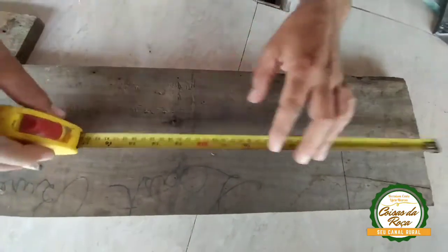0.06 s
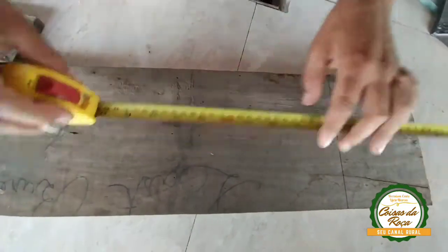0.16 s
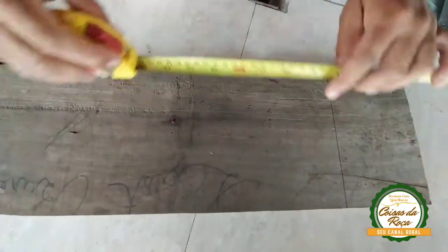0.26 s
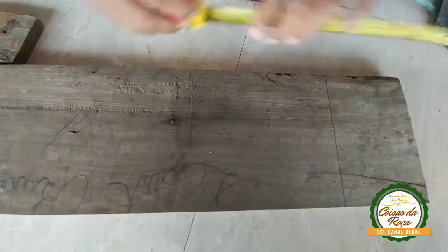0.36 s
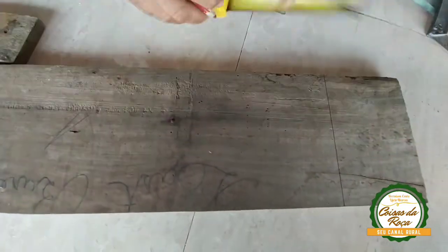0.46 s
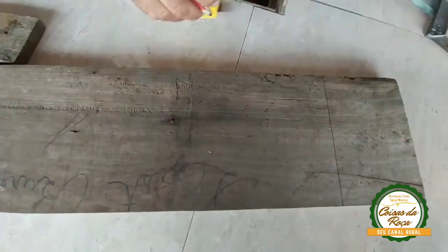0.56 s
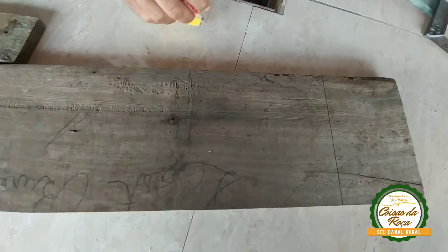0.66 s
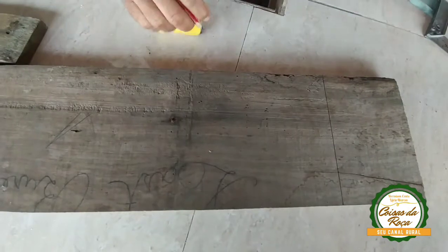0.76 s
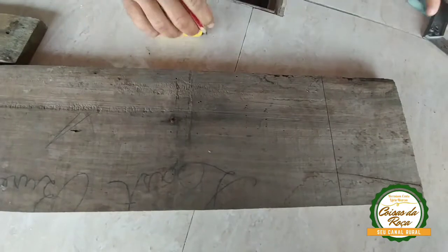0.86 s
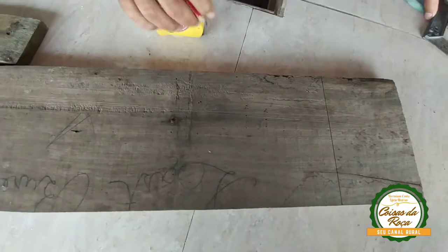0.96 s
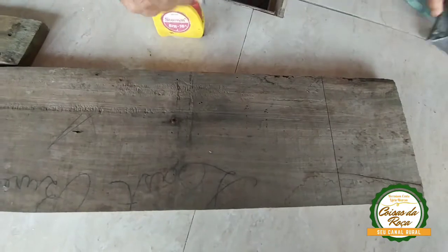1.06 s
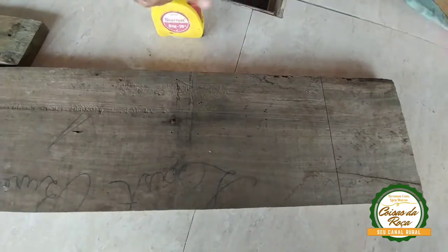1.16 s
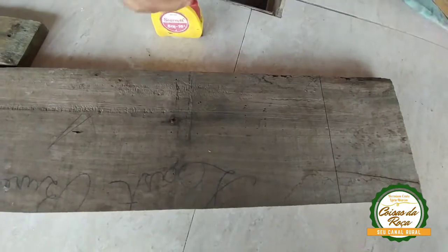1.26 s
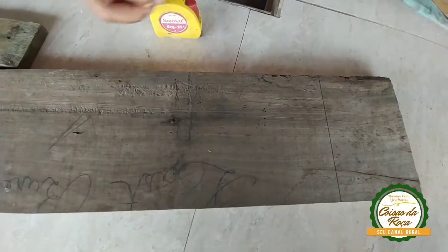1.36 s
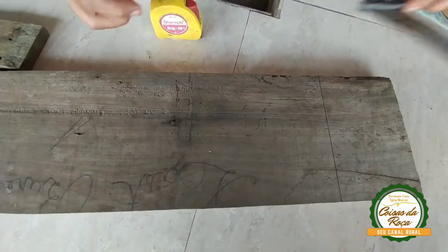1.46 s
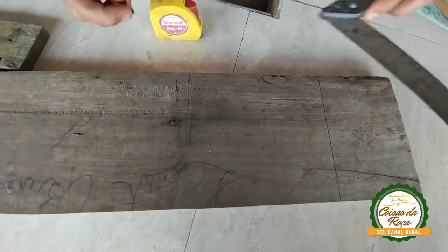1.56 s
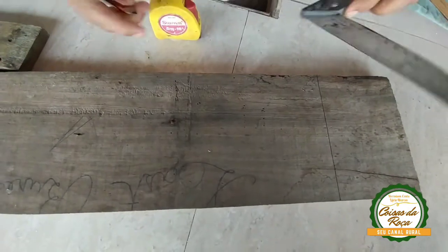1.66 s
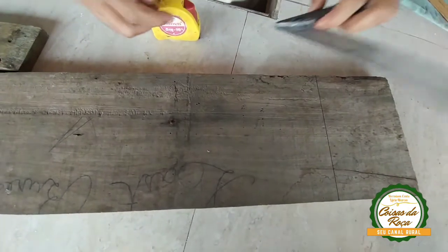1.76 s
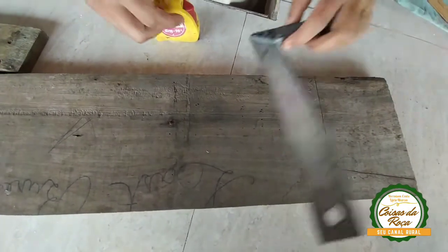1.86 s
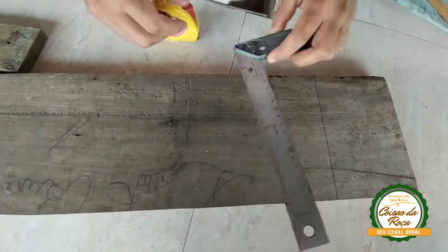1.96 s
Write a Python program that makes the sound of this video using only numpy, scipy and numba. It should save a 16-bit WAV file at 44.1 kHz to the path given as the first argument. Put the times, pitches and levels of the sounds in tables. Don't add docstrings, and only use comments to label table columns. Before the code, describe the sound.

A steel tape measure whirs and slaps back into its plastic case, then is set down

```python
import sys
import numpy as np
from scipy import signal
from scipy.fft import rfft, irfft
from scipy.io import wavfile
from scipy.ndimage import uniform_filter1d
from numba import njit

SR = 44100
rng = np.random.default_rng(int(sys.argv[2]) if len(sys.argv) > 2 else 0)


def to_wav(sig):
    pcm = np.clip(np.atleast_2d(sig), -1, 1) * 32767
    pcm = np.round(pcm).astype(np.int16)
    wavfile.write(sys.argv[1], SR, pcm.T)


def how_loud(loudness_db):
    steps = np.asarray(loudness_db, float) / 20
    return 10 ** steps


N = 88200


def unit(x):
    return x / np.sqrt(np.mean(x ** 2) + 1e-30)


def curve(table, order):
    rows = np.array(table)
    return np.interp(np.arange(N) / SR, rows[:, 0], rows[:, order])


def butter(x, order, hz, kind="low"):
    return signal.sosfilt(signal.butter(order, hz, kind, fs=SR, output="sos"), x)


def colour(x, points):
    size = 4096
    hz, db = np.array(points).T
    log_hz = np.log(np.maximum(np.arange(size // 2 + 1), 1) * SR / size)
    corners = np.log(np.r_[hz[0] / 2, hz, hz[-1] * 1.2])
    db = np.interp(log_hz, corners, np.r_[db[0] - 30, db, db[-1] - 30])
    cep = irfft(db * np.log(10) / 20)
    cep[1:size // 2] *= 2
    cep[size // 2 + 1:] = 0
    h = irfft(np.exp(rfft(cep)))
    h = (h / np.linalg.norm(h)).reshape((1,) * (x.ndim - 1) + (-1,))
    return signal.fftconvolve(x, h, axes=-1)[..., :N]


def ring(x, modes):
    t = np.arange(SR // 4) / SR
    h = 0
    for hz, db, t60 in modes:
        decay = how_loud(db - 60 * t / max(t60, .003))
        h = h + decay * (1 - np.exp(-t * hz)) * np.sin(2 * np.pi * hz * t)
    return signal.fftconvolve(x, h / np.linalg.norm(h))[:N]


def clicks(rate):
    scatter_db = 3
    chance, sign, size = rng.random((3, N))
    return unit((chance < rate / SR) * np.sign(sign - .5) * how_loud(-scatter_db * np.log(size + 0.0141)))


def walk(rate):
    k = int(SR / rate)
    steps = np.repeat(rng.standard_normal(N // k + 1), k)
    return 1.253 * uniform_filter1d(uniform_filter1d(steps, k), k)[:N]


def burst(at, length):
    s = np.maximum(np.arange(N) / SR - at, 0) / max(length, 3e-4)
    return 2 * (1 - np.exp(-s * 4)) * np.exp(-s)


def ports(x, pan_db, lag_ms):
    late = np.interp(np.arange(N) - lag_ms * SR / 1000, np.arange(N), x)
    return np.array([x * how_loud(pan_db / 2), late * how_loud(-pan_db / 2)])


def tape():
    # time_s, level_db, case_share_db
    whir = [
        (.325, -25, -31),
        (.4, -24, -18),
        (.48, -24, -22),
        (.56, -24.5, -14.5),
        (.64, -24, -19),
        (.68, -27.5, -37.5),
        (.718, -20.5, -20),
    ]
    # start_s, peak_db, burst_s, case_share_db
    slaps = [(.069, -35, .003, -15), (.123, -33, .004, -15), (.141, -24, .003, -24), (.163, -27, .008, -26),
             (.2102, -24, .0015, -24), (.2125, -14, .002, -27), (.2175, -11, .0018, -22),
             (.2207, -10, .001, -19), (.2348, -19, .0015, -24), (.239, -25, .002, -24),
             (.255, -18, .0015, -24), (.2583, -17, .002, -24), (.2655, -21, .0015, -24),
             (.268, -20, .002, -22), (.2732, -11, .0015, -26), (.2775, -22, .002, -24),
             (.3168, -22, .0015, -24), (.3187, -9, .0025, -24), (.3225, -11, .001, -16),
             (.3255, -19, .0015, -22), (.3293, -7, .0014, -24), (.3505, -14, .002, -27),
             (.361, -16, .0015, -26), (.3836, -15, .0015, -26), (.395, -17, .0015, -26),
             (.411, -14, .002, -22), (.437, -14, .003, -22), (.4694, -11, .004, -24),
             (.478, -15, .002, -24), (.5085, -12, .004, -27), (.536, -13, .003, -22),
             (.6615, -17, .002, -22), (.6725, -17, .005, -18), (.692, -14, .003, -24),
             (.7035, -15, .003, -22), (.7155, -7, .003, -20), (.850, -13, .007, -14),
             (.909, -10, .002, -14)]
    # hz, level_db
    blade_colour = [(1760, -39), (3100, -11.5), (4060, -15.5), (5240, -14), (7400, -9), (9200, -0.5),
                    (11500, -7.5), (14300, -19)]
    # hz, level_db
    case_colour = [(330, -9.5), (600, -2), (1490, 1.5), (2710, 11), (3730, 13), (4500, -8.5), (5850, -62),
                   (9900, -120)]
    t = np.arange(N) / SR
    pan_db = np.where(t < .34, -8, -3)

    def ticks(rate):
        second_share = 1.135
        return ports(clicks(rate), pan_db, -0.13) + second_share * ports(clicks(rate), pan_db, 1.3)

    running = (t > whir[0][0]) & (t < whir[-1][0])
    flutter_db = 2 * walk(150)
    blade = running * how_loud(curve(whir, order=1) - 4.0 + flutter_db) * ticks(12000)
    case = blade * how_loud(curve(whir, order=2))
    slap = ticks(14000)
    for at, db, length, case_db in slaps:
        shape = burst(at, length)
        even = np.sqrt(np.sum(shape ** 2) / np.sum((shape * slap) ** 2))
        hit = how_loud(db - 3) * shape * slap * even
        blade = blade + hit
        case = case + how_loud(case_db + 7.0) * hit
    ring_share_db = 6
    steel = patchy(colour(blade, blade_colour) + how_loud(ring_share_db) * sing(blade))
    return steel + colour(case, case_colour) + coil_rub()


def sing(x):
    # pitch_hz, width_hz, level_db
    blade_rings = [
        (9120, 660, 3.5),
        (9360, 740, 1.5),
        (10600, 790, -6.5),
        (6820, 700, -8),
    ]
    out = 0
    for hz, width, db in blade_rings:
        centre = hz * (1 + .035 * walk(45))
        out = out + how_loud(db) * np.array([svf(v + 1e-18, centre, width) for v in x])
    return out


@njit
def svf(x, hz, width):
    y, band, low = np.empty(len(x)), 0., 0.
    for i in range(len(x)):
        g, k = np.tan(np.pi * hz[i] / SR), width / hz[i]
        v = (band + g * (x[i] - low)) / (1 + g * (g + k))
        band, low, y[i] = 2 * v - band, low + 2 * g * v, k * v
    return y


def patchy(x):
    swell_db, swell_rate = 2.8, 30
    edges = np.geomspace(2000, 19000, 14)
    out = 0
    for band in zip(edges, edges[1:]):
        out = out + butter(x, 2, band, "band") * how_loud(swell_db * walk(swell_rate))
    return out


def coil_rub():
    # pitch_hz, width_hz, start_s, end_s, level_db
    coil = (580, 110, .5, .77, -52)
    t = np.arange(N) / SR
    hz, width, start, end, db = coil
    level = (t > start) * (t < end) * how_loud(db + 1.0 * walk(7.5))
    return level * ring(clicks(3000), [(hz, 0, 3.9 / width)])


def knocks():
    # start_s, level_db, left_over_right_db, right_lag_ms, contact_s, chatter_share
    blows = [
        (0.547, -39, -3, -0.2, 0.019, 7.5),
        (0.716, -12, -6.5, 0.029, 0.0043, 0.83),
        (0.7221, -20.5, -3.5, -0.11, .001, 0.314),
        (0.851, -19.5, -11.5, 0.56, 0.007, 1.13),
        (0.9095, -8, -2, 0.067, 0.00049, 0.12),
        (0.9124, -8, 0, 0.08, 0.00086, 0.13),
        (1.125, -23, -4.5, -0.12, 0.015, 4.5),
    ]
    # pitch_hz, level_db, t60_s
    slop = [(596, -2, 0.0416), (723, 5, 0.029), (980, 3.5, 0.031)]
    snap = [(1266, -2.5, 0.019), (1547, -1, 0.017), (2450, -2, 0.017), (3000, 4, .012), (4780, 9, .012),
            (4960, 12, .014), (6520, 8, .01), (7250, 7.5, .01)]
    seat = [(515, 0, 0.018), (630, -1.5, 0.017), (805, 0, 0.022)]
    tilt = [(1270, -2.5, 0.039), (1980, 0.5, .015), (2400, 11.5, .018), (2700, -34, .015), (4280, 5, .012)]
    land = [(185, -11, 0.11), (818, -20, 0.026), (980, -9, .04), (1107, 0.5, 0.021), (1397, -6, 0.025),
            (1892, -3, 0.016), (2120, -5.5, .015), (3270, 0, 0.0085), (5500, 6, 0.0069)]
    nudge = [(490, -7.5, 0.049), (785, -0.5, 0.032), (1077, -0.5, 0.029), (1330, 2.5, 0.022),
             (1554, 6, 0.02), (1952, 9.5, 0.014), (2146, 4, .015), (2480, 8.5, .015)]
    longest_cycles = 30
    out = 0
    for blow, modes in zip(blows, (slop, snap, seat, tilt, land, land, nudge)):
        at, db, pan_db, lag_ms, contact, chatter = blow
        push = 3 * burst(at, 0) ** 3 + chatter * burst(at, contact) * clicks(9000)
        x = ring(push, [(hz, g, min(t60, longest_cycles / hz)) for hz, g, t60 in modes])
        x = butter(x, 2, 0.79 * modes[0][0], "high")
        out = out + ports(how_loud(db) * x / np.abs(x).max(), pan_db, lag_ms)
    return out


def slide():
    # start_s, level_db, rise_s, hold_s, fall_db_per_s
    strokes = [
        (1.129, -37.5, 0.01, 0.018, 400),
        (1.18, -33.5, 0.002, 0.032, 398),
    ]
    # hz, level_db
    scrape_colour = [(880, -41), (1500, -9), (3540, -12), (4370, -7), (6000, -5), (7790, -13.5),
                     (9820, 6.5), (15000, -18)]
    # pitch_hz, level_db, t60_s
    tool_rings = [
        (4050, 12, 0.048),
        (9800, 10, 0.04),
        (11900, -11, 0.031),
    ]
    t = np.arange(N) / SR
    push = 0
    for at, db, rise, hold, fall in strokes:
        fallen_db = fall * np.maximum(t - at - rise - hold, 0)
        push = push + np.clip((t - at) / rise, 0, 1) * how_loud(db - fallen_db)
    x = push * how_loud(3.1 * walk(120)) * clicks(11000)
    ring_db = -14.5
    return ports(colour(x, scrape_colour) + how_loud(ring_db) * ring(x, tool_rings), 2, .25)


def porch(x):
    early_t60_s, early_db, early_low_hz = .008, -10, 1700
    late_t60_s, late_db, late_dark_hz = 0.31, -12, 10300
    t = np.arange(SR // 2) / SR
    early = rng.standard_normal((2, len(t))) * how_loud(-60 * t / early_t60_s)
    late = rng.standard_normal((2, len(t))) * how_loud(-60 * t / late_t60_s) * (t > .004)
    early = butter(early, 2, early_low_hz, "high")
    late = butter(late, 1, late_dark_hz)
    h = how_loud(early_db) * early / np.linalg.norm(early[0]) + how_loud(late_db) * late / np.linalg.norm(late[0])
    return signal.fftconvolve(x, h, axes=-1)[:, :N]


def rustle():
    # time_s, level_db
    hands = [
        (0, -47.5),
        (.1, -50.5),
        (.2, -51),
        (.8, -42.5),
        (1.05, -53.5),
        (1.3, -59),
        (1.55, -62.5),
        (2, -60.5),
    ]
    skin_colour = [(900, -3), (2500, -5.0), (5000, -7.5), (9500, -1.0), (14000, -17.5)]  # hz, level_db
    x = colour(np.array([clicks(7000), clicks(7000)]), skin_colour)
    return x * how_loud(curve(hands, order=1) + 2.5 * walk(30.3))


def insects():
    # time_s, pitch_hz, level_db
    drone = [(0, 2340, -58), (1.3, 2230, -60), (1.36, 2400, -58), (1.45, 2380, -56.5), (1.53, 2200, -63),
             (1.62, 2260, -56), (1.68, 2420, -58.5), (1.77, 2400, -61), (1.82, 2250, -69), (2, 2350, -63)]
    width_hz, overtone, overtone_db = 90, 1.48, -9.5
    wobble = butter(rng.standard_normal((2, N)), 2, width_hz / 2)
    cycles = np.cumsum(curve(drone, order=1) * (1 + 0.00818 * walk(11))) / SR
    upper = how_loud(overtone_db + 4.07 * walk(11)) * np.exp(2j * np.pi * overtone * cycles)
    turn = np.exp(2j * np.pi * cycles) + upper
    band = unit(((wobble[0] + 1j * wobble[1]) * turn).real)
    return ports(band * how_loud(curve(drone, order=2) + 1.55 * walk(12.4)), -10.5, -0.35)


def two_port_noise(share):
    return share * rng.standard_normal(N) + rng.standard_normal((2, N))


def puffs():
    # centre_s, level_db, length_s, left_over_right_db
    gusts = [(0, -52.5, 0.066, 3), (0.15, -47, 0.063, 2), (0.372, -58, 0.1, 2), (0.56, -53.5, 0.04, -8.5),
             (0.686, -40.5, 0.032, -18), (0.98, -45, 0.093, 0), (1.132, -51.5, 0.029, -19),
             (0.211, -46, 0.004, 13), (1.636, -62, 0.012, -7), (1.695, -48.5, 0.014, -18.5),
             (1.99, -70, 0.017, -21)]
    # hz, level_db
    puff_colour = [(25, -0.5), (70, -2.5), (130, -8), (265, -13), (400, -18.5)]
    t = np.arange(N) / SR
    air = how_loud(-60.5)
    for at, db, length, pan_db in gusts:
        sides_db = db + pan_db / 2 * np.array([[1], [-1]])
        air = air + how_loud(sides_db) * np.exp(-((t - at) / length) ** 2)
    return unit(colour(two_port_noise(0.48), puff_colour)) * air * how_loud(1.95 * walk(25))


def yard():
    # hz, level_db
    hiss_colour = [(59, -21), (100, -7), (214, -4.5), (668, -6.5), (956, -7), (1260, -11.5), (2320, -3.5),
                   (8770, -22.5), (15500, -30.5)]
    return unit(colour(two_port_noise(0.29), hiss_colour)) * how_loud(-55 + 2.4 * walk(6.06))


def scene():
    near = tape() + knocks() + slide()
    return near + porch(near) + rustle() + insects() + puffs() + yard()


def band_limit(x):
    return signal.sosfilt(signal.butter(12, 16290, fs=SR, output="sos"), x)


def record(dry):
    top_cut = signal.ellip(8, .2, 70, 15600, fs=SR, output="sos")
    return band_limit(signal.sosfilt(top_cut, dry))


dry = scene()
out = record(dry)
to_wav(out)
```